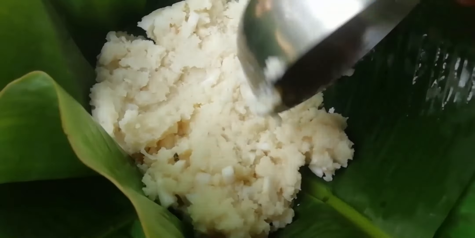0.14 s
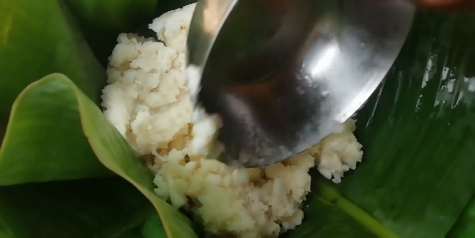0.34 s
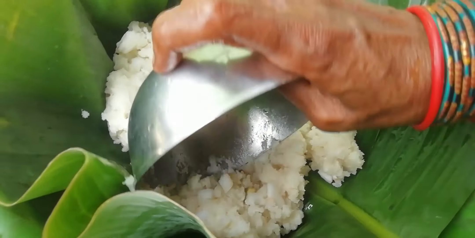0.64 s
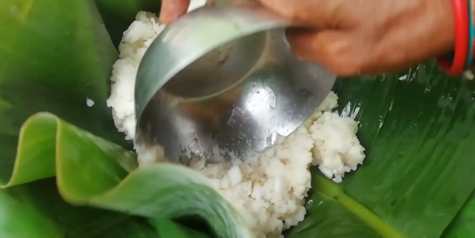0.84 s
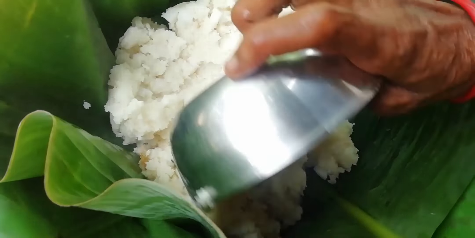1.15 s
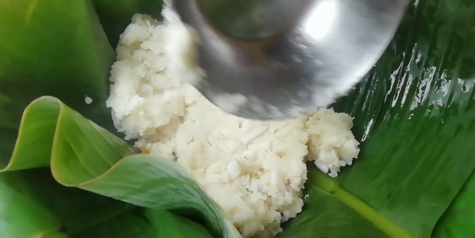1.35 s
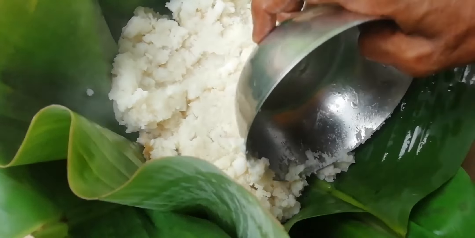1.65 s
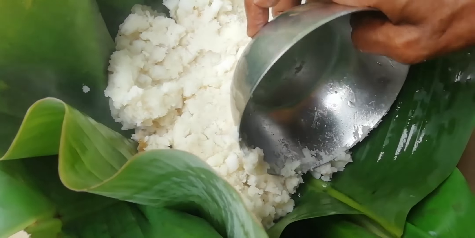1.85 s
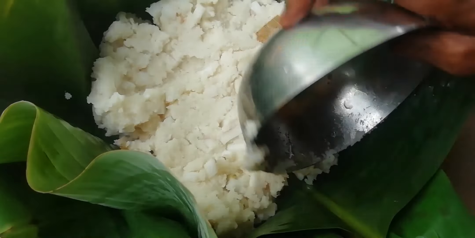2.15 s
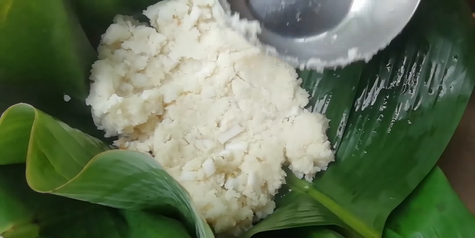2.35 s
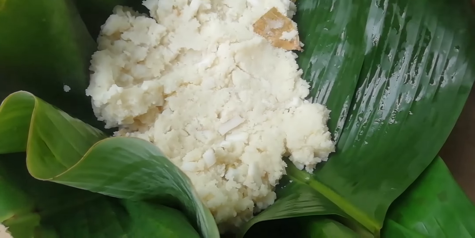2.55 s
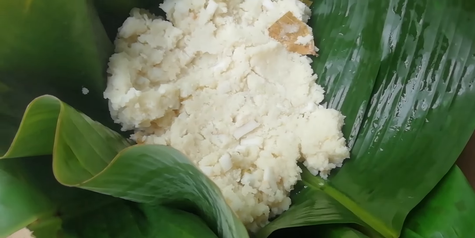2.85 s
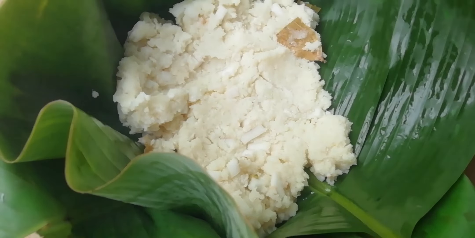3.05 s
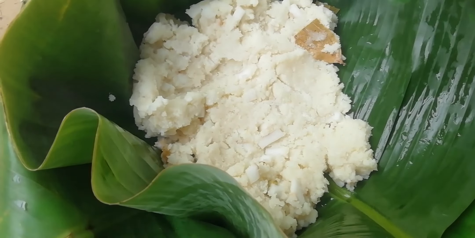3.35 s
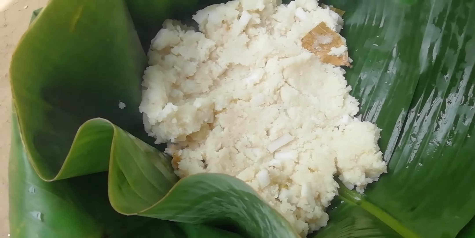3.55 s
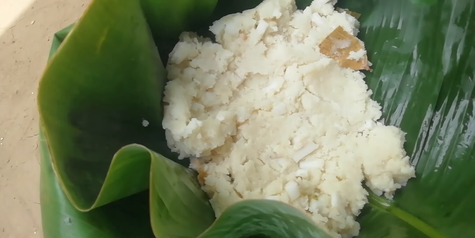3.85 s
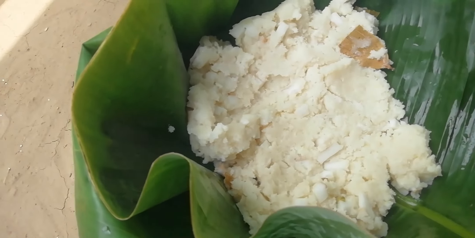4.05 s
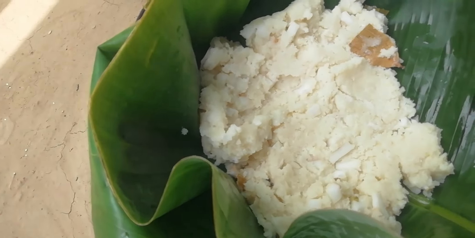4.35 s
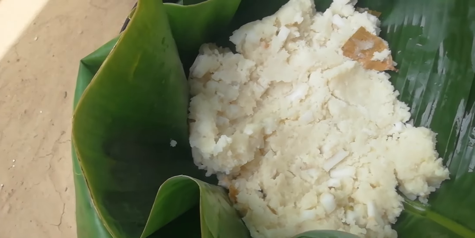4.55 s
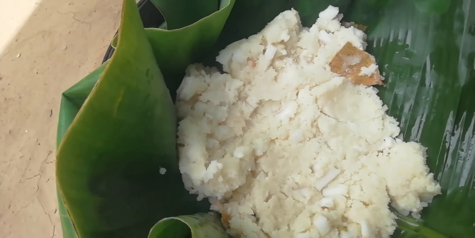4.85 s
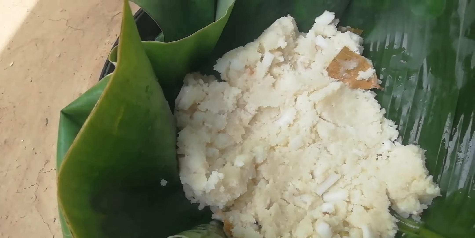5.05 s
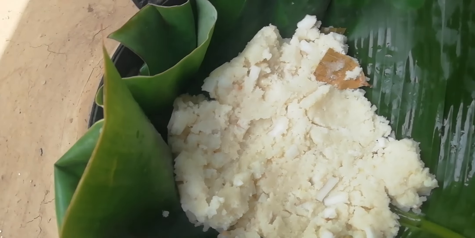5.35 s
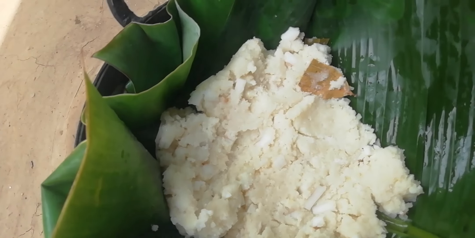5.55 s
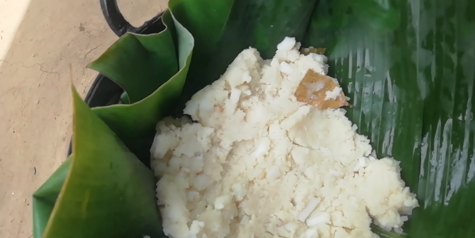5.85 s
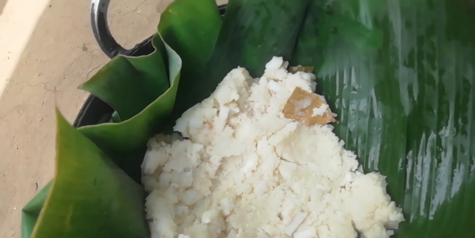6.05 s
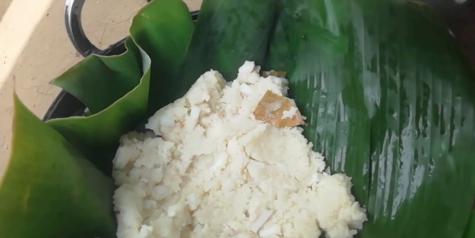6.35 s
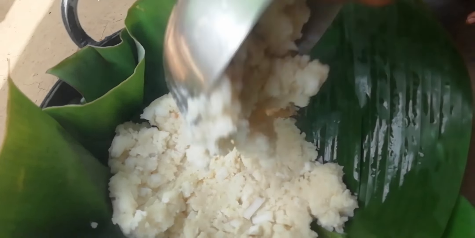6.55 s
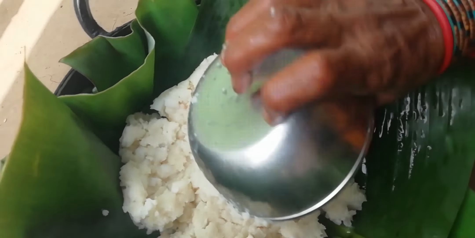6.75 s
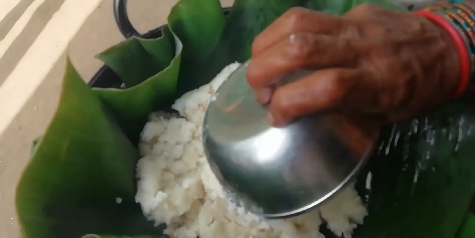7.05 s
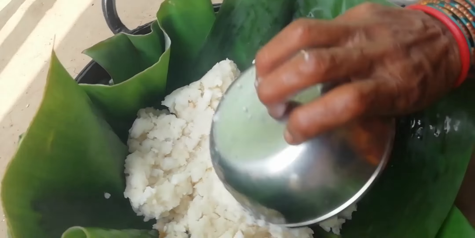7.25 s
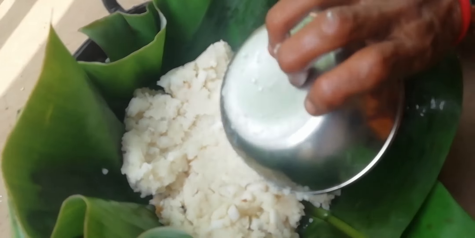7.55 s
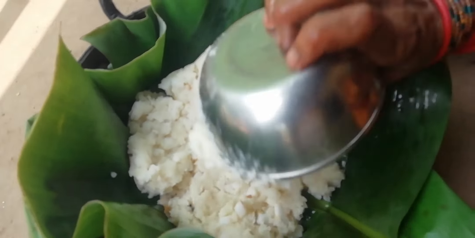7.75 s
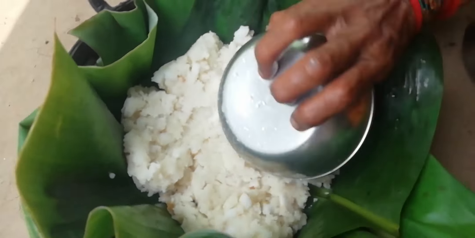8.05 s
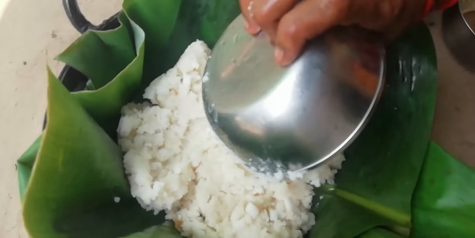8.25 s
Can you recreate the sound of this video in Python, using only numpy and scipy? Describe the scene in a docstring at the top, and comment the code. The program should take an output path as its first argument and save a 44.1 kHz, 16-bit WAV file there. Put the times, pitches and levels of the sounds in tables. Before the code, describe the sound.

Close up, in a quiet kitchen, a steel bowl works moist crumbly rice in a leaf-lined pot. From 0 to 0.5 s there is light, fizzy crackle with a few snaps; at about 0.6-0.9 s a firm, grainy scrape with woody leaf clicks. Shorter rubs follow, with another strong push near 1.7-2 s and brighter ticks until 2.5 s. A crisp snap lands near 2.9 s, then from 3 to 4.3 s the rustle is faint and sparse. Leaf snaps gather from 4.4 s, the sharpest at 4.7 s, with busy clusters at 5.2-5.6 s and 5.8-6.3 s. From 6.4 to 7.4 s it is nearly still, with thin ticks; a clear click comes at 7.5 s, then a soft wet rustle swells from 7.9 to 8.4 s. Occasional dull low pot bumps, very short reflections and gentle rumble lie underneath.

```python
"""A steel bowl pushes and spreads moist, crumbly rice in a pot lined with fresh leaves, close to the microphone.
Sticky grains part and scrape under the rim: a fine crackle of dense random clicks over a smooth hiss.
The stiff leaves buckle in short dry snaps, single clicks that scatter and ring in the pot.
Now and then a nudge rocks the pot, a few low decaying tones; behind it a quiet kitchen gives
faint reflections and a low rumble of shaped noise."""
import sys
import numpy as np
from scipy import signal
from scipy.fft import rfft, irfft
from scipy.io import wavfile
from scipy.ndimage import uniform_filter1d

SR = 44100
rng = np.random.default_rng(int(sys.argv[2]) if len(sys.argv) > 2 else 0)


def inscribe(sig):
    """Save sig as 16-bit PCM at rate SR to the path in sys.argv[1].

    A 1-D sig is mono; a 2-D sig holds one channel per row.
    Samples are clipped to [-1, 1] before scaling.
    """
    pcm = np.round(np.clip(np.atleast_2d(sig).T, -1, 1) * 32767)
    wavfile.write(sys.argv[1], SR, pcm.astype(np.int16))


N = 370440
SIZE, LEAD_IN = 1024, 24  # samples in one click, and those before its peak
TIME = np.arange(N) / SR
BIN_HZ = np.maximum(np.fft.rfftfreq(SIZE, 1 / SR), 1)
LONG_HZ = np.maximum(np.fft.rfftfreq(N, 1 / SR), 1)
SIDES = np.array([[1], [-1]])  # left, right


def from_db(db):
    """Decibels to gain."""
    return 10 ** (np.asarray(db) / 20)


def rms_one(x):
    """Scale to unit rms."""
    return x / np.sqrt(np.mean(x ** 2) + 1e-20)


def at_hz(points, hz, axis=1):
    """Read a column of a spectrum on a log-frequency axis."""
    points = np.array(points)
    return np.interp(np.log(hz), np.log(points[:, 0]), points[:, axis])


def in_time(rows, t):
    """Read every column of a curve at times t."""
    s, *columns = np.transpose(rows)
    return [np.interp(t, s, c) for c in columns]


def drift(rate):
    """Slow random wander of unit rms, with rate turning points drawn per second."""
    knots = rng.standard_normal(4096)
    return rms_one(np.interp(TIME * rate, np.arange(len(knots)), knots))


# level of the continuous rustle under the strokes: t/s, level/dB (before RUSTLE_DB)
RUSTLE_LEVEL = [(0.0, -30), (0.47, -33), (0.75, -23), (0.93, -30.5), (1.45, -29), (1.82, -27), (2.32, -32),
                (2.99, -36), (4.3, -40), (4.45, -37.5), (5.01, -38), (5.36, -36.5), (5.61, -40.5),
                (6.08, -32), (6.41, -40), (7.32, -41.5), (8.16, -30), (8.4, -31.5)]
RUSTLE_DB, RUSTLE_HOLLOW_DB, RUSTLE_FIZZ_DB = -2, -0.5, 8.5
# pushes of the bowl and shifts of the leaves: from t/s, to t/s, level/dB (at the start),
# hollowness/dB, fizz/dB
BOWL_STROKES = [(0.107, 0.169, -34.5, 9, 14), (0.567, 0.884, -21.5, -7.5, -13),
                (0.935, 1.185, -29, 3.5, -24), (1.408, 1.538, -31, 8, -9), (1.61, 1.73, -26.5, -0.5, -19),
                (1.713, 1.978, -20, -5.5, 2.5), (1.953, 2.257, -30.5, 3, 7), (2.524, 2.71, -35, -9, 1),
                (3.059, 3.084, -28.5, -5, 13.5), (3.251, 3.274, -31.5, -3, 9.5),
                (3.332, 3.455, -32, -2, -2), (3.655, 3.844, -34, 5, 3), (3.888, 4.048, -35.5, -1, 5),
                (4.274, 4.384, -34.5, 5, 8.5), (4.381, 4.474, -30, 2, 4), (4.529, 4.643, -34.5, -4, 6.5),
                (4.823, 4.83, -33, 8, 7), (5.19, 5.4, -32.5, 6.5, 4), (5.433, 5.45, -29.5, -15, -1),
                (5.833, 6.001, -31.5, 4.5, 3.5), (6.114, 6.262, -34, 6.5, 1), (6.284, 6.33, -31, 0, 3),
                (6.41, 6.448, -36.5, -5, 12), (6.804, 7.047, -39, -1.5, 8), (7.204, 7.39, -39.5, -7, 13),
                (7.48, 7.65, -38, -3, 1), (7.72, 7.756, -35.5, 1, -2), (7.824, 7.89, -36, -7, -7),
                (7.905, 8.381, -31, 1, 9)]
# each stroke grips, eases off as the rice gives way, and lets go
ATTACK_S, EASE_DB_PER_S, RELEASE_S = 0.038, 9.5, 0.028
# the rice sticks and slips, so the force wavers
SLIP_DB, SLIPS_PER_S = 0.83, 40


def rubbing():
    """Continuous rustle and strokes add in power: level, hollowness and fizz over time, in dB."""
    rustle_db = in_time(RUSTLE_LEVEL, TIME)[0] + RUSTLE_DB
    rustle_bands = from_db([[0], [RUSTLE_HOLLOW_DB], [RUSTLE_FIZZ_DB]])
    power = from_db(rustle_db) ** 2 * rustle_bands ** 2
    for start, stop, stroke_db, hollow_db, fizz_db in BOWL_STROKES:
        rise = (TIME - start) / ATTACK_S
        fall = (stop - TIME) / RELEASE_S
        grip = np.clip(np.minimum(rise, fall) + .5, 0, 1)
        on = grip > 0
        force = grip[on] * from_db(stroke_db - EASE_DB_PER_S * (TIME[on] - start))
        power[:, on] += (force * from_db([[0], [hollow_db], [fizz_db]])) ** 2
    middle, lows, treble = 10 * np.log10(power)
    return middle + SLIP_DB * drift(SLIPS_PER_S), lows - middle, treble - middle


def crackle(level_db, hollow_db, fizz_db, gain_db=-1, band_hz=1750, band_width_hz=550, band_db=-0.95,
            wander_db=2.5, wanders_per_s=30):
    """Rice and leaves rub with changing force, hollowness and wetness.

    The level of the band near 1.7 kHz wanders at random."""
    _, pan_db = in_time(PLACE_OF_WORK, TIME)
    bed = grains(level_db)
    spectrum = rfft(bed)
    lows = irfft(spectrum * hollow_share(LONG_HZ), N)
    treble = irfft(spectrum * fizz_share(LONG_HZ), N)
    band = signal.lfilter(*signal.iirpeak(band_hz, band_hz / band_width_hz, fs=SR), bed)
    bed = bed + lows * (from_db(hollow_db) - 1) + treble * (from_db(fizz_db) - 1)
    bed = bed + band * (from_db(band_db + wander_db * drift(wanders_per_s)) - 1)
    return bed * from_db(level_db + gain_db + SIDES * pan_db / 2)


# where the work goes on: t/s, lead of the left port/ms, left-right/dB
PLACE_OF_WORK = [(0, 0.093, -0.5), (.7, 0.11, 2.5), (1.5, .11, 0.5), (2.1, 0.091, 2.5), (2.7, 0.1, 2),
                 (3.6, 0.069, 1), (4.3, -0.045, -1), (5.3, 0.05, -0.5), (6.1, -.02, 1.5), (6.8, 0.077, 3.5),
                 (7.6, 0.076, 2), (8.4, 0.075, 1)]


def grains(level_db, per_s=1600, crowding=.4, spread_db=5.0, smoothing=0.061, largest=4.52,
           clump_db=2.0, hiss_db=-10, low_hz=700, high_hz=14000, count=24):
    """Sticky grains let go in clumps, each at one of count pitches, for a crackle of rms 1.

    Harder rubbing makes them denser and more even."""
    harder_db = level_db - np.mean(level_db)
    rate = per_s * from_db(crowding * harder_db + clump_db * drift(90))
    born = rng.random(N) < rate / SR
    size_db = (spread_db - smoothing * harder_db) * np.minimum(rng.exponential(1, N), largest)
    sizes = born * from_db(size_db) * rng.choice([-1, 1], N)
    # local levelling over 43 ms
    sizes /= np.sqrt(np.maximum(uniform_filter1d(sizes ** 2, int(0.043 * SR)), 1e-6))
    lead_ms, _ = in_time(PLACE_OF_WORK, TIME)
    lead = np.round(lead_ms * SR / 10 ** 3).astype(int)
    later = np.clip(np.arange(N) - lead, 0, N - 1)  # what the right port hears
    kinds, pot, out = rng.integers(0, count, N), pot_colour(), 0
    # between the grains, steel sliding on paste gives a smooth hiss
    force = sizes + from_db(hiss_db) * rng.standard_normal(N)
    for kind, hz in enumerate(np.geomspace(low_hz, high_hz, count)):
        train = force * (kinds == kind)
        colour = pot * ring(hz, lift_db=11.0, spread=0.34)
        wave = click(colour, scatter_db=9.5, scatter_t60=0.012)
        out = out + signal.oaconvolve(np.array([train, train[later]]), wave, axes=1)[:, :N]
    return rms_one(out)


# single snaps and ticks, loud and faint: t/s, level/dB (over 4.5 ms, before gain and band lifts),
# ring f/Hz, hollowness/dB, fizz/dB, left-right/dB
LEAF_SNAPS = [(0.083, -21.5, 2380, -7, 2, -1), (0.1357, -14.5, 1150, -4, -13, -3),
              (0.188, -23, 2880, -26, 1, 7), (0.2866, -16, 1840, 10.5, -1, -4.5),
              (0.456, -22, 2400, 0, -7, -5), (0.5875, -17, 4530, -13, -17, -3),
              (0.6742, -17, 1770, 2.5, -20, -4), (0.7568, -16, 1400, -14, -10, 4),
              (0.8108, -17.5, 1670, -2, -15, -5), (0.8651, -11, 1190, -5, -18, -5),
              (0.9485, -16, 3200, -4, -22, -1), (1.0912, -13.5, 1500, 8, -20, 2),
              (1.1328, -13.5, 1080, 5.5, -23, 7), (1.2608, -16, 3220, -3.5, 3, 3),
              (1.334, -19.5, 2250, 1.5, -21, -3), (1.3892, -16, 1750, 5, -16, 1),
              (1.5049, -19, 1900, 12, 2, -1), (1.5187, -12, 6200, -3, 4.5, 5),
              (1.5366, -15, 2010, 8, -2, 1), (1.6047, -14.5, 1880, 7.5, -16, -1),
              (1.8063, -12.5, 1740, 2.5, -20, 1), (1.8357, -18, 3050, -18, -8, -5),
              (1.9757, -18.5, 5930, 2, 1, 11), (1.9957, -16, 5000, 1, 7.5, 7.5),
              (2.1689, -21.5, 2460, 12.5, 4, 4), (2.18, -27, 4930, 12, -6, 8),
              (2.2534, -17, 4660, 4.5, 6, 7), (2.3519, -19, 2180, 5, 1, -2),
              (2.3698, -20.5, 2490, 5, -6, -3), (2.393, -23.5, 2180, -1, -11, 9),
              (2.4688, -16, 3580, -1, -2, 7), (2.5462, -22, 4400, 4, -10, 2),
              (2.7171, -25.5, 1970, 2.5, -4, -2), (2.7982, -22, 6000, -14, 9, -1),
              (2.909, -15.5, 2060, -4.5, 3.5, 7), (3.0561, -21, 2000, 2, 11, 2),
              (3.1559, -16, 1680, -1.5, 0, -3), (3.5235, -19, 3200, -5.5, 4, 14.5),
              (3.797, -28.5, 1900, 10, -4, 3), (3.887, -22.5, 1140, 4.5, -13, 0),
              (3.9622, -27, 4500, -17, 3, 18), (4.0805, -33, 2140, 5, 14, -3),
              (4.0979, -26.5, 1220, 3, -6, 0), (4.196, -33, 2060, -2, 16, 0),
              (4.2197, -21.5, 1550, 5.5, 1.5, 0), (4.2854, -25.5, 6130, -4, 12.5, 7),
              (4.3556, -24, 1890, 11.5, -12, 0), (4.3963, -21, 2050, 2, 3, 0),
              (4.4177, -29.5, 1860, -1, 19.5, -1), (4.4561, -19, 1420, 0.5, 1, -1),
              (4.6138, -18, 1810, 6, -30, -1), (4.6791, -8, 2470, 1.5, -0.5, -2.5),
              (4.7508, -13, 4790, 6.5, 0, -0.5), (4.8423, -16.5, 2680, 4, 1, 2),
              (4.8517, -19.5, 5930, -2, 0, 6.5), (4.9727, -27, 1900, 11.5, 0, 1),
              (5.0271, -26, 1970, 3, 6, -3), (5.098, -19, 1570, 10, -11, 1), (5.187, -24, 2730, 14, 4, -1),
              (5.2744, -17, 6100, 4.5, 6, 2), (5.2979, -22, 3720, 9, 14, 0),
              (5.3132, -18.5, 2600, -3, -9, 4), (5.328, -17, 2780, 0, 10, 2),
              (5.3605, -20.5, 2000, 7.5, 5, 2), (5.4311, -14, 4300, 0.5, -9, 0),
              (5.4504, -18, 4900, -1, -1, 4), (5.531, -17, 2980, -4, 8.5, 8.5),
              (5.551, -18.5, 2860, 2, 8.5, 1), (5.7834, -28, 6040, -7, 10.5, 5),
              (5.8466, -21, 5300, 5, -13, 3), (5.8797, -19, 1930, 8.5, -12, -2),
              (5.901, -23.5, 2000, 12, -1, -1), (5.9442, -17, 2280, 9.5, 0, 1),
              (5.96, -18.5, 1900, 13.5, -7, 0), (6.0173, -15, 5450, 3, 4.5, 1),
              (6.053, -10.5, 2580, 10, 4, 1), (6.1226, -27.5, 2000, 13.5, -5, -1),
              (6.1643, -16, 5900, 4, 4.5, 1.5), (6.2002, -18, 2130, -8, -11, 10),
              (6.218, -14.5, 2370, 9, 0, 1), (6.3007, -16.5, 726, 4, 5.5, 3),
              (6.319, -20.5, 3050, -3, -3, 6), (6.6752, -25.5, 1450, -2, -19, -1),
              (6.7454, -27, 2570, -1, 18.5, 0), (6.7582, -21.5, 4540, 3, 8, 3),
              (6.8344, -30.5, 1950, 14.5, 15, -2), (6.9033, -22, 1140, -26, 1, 14.5),
              (6.975, -27.5, 1970, -4, -11, -6), (7.1407, -19.5, 4200, -11, 12.5, 3),
              (7.2663, -29.5, 2630, -2, 7, 1), (7.4406, -30, 2120, -6, 19.5, -2),
              (7.4916, -14.5, 1160, -7, -8, -2.5), (7.56, -22, 3060, -1, -8, 2),
              (7.6432, -20.5, 4340, -9, 5, -2), (7.7972, -18, 3300, -5, -21, 3),
              (8.0215, -18.5, 4450, 3, 4, -3), (8.1571, -17.5, 5400, 1.5, -3, 0),
              (8.2076, -21, 2230, 5.5, 8, 3), (8.337, -18, 4280, 5, 4, 2)]


def snaps(rows, gain_db=-2.73, bite_db=-2.0, dulling=0.11, dull_hz=1800, sharp_hz=3100):
    """Each buckling fold has its own size, ring and place; the hollower it is, the less it bites."""
    out, pot = np.zeros((2, N + 2 * SIZE)), pot_colour(low_cut_hz=344)
    hollow, fizz = hollow_share(BIN_HZ), fizz_share(BIN_HZ)
    # bite tilts the middle band from dull to sharp
    bite = at_hz([(dull_hz, -1), (sharp_hz, 1)], BIN_HZ) * (1 - hollow - fizz)
    length = np.sqrt(.0045 * SR)  # click energy to level over 4.5 ms
    for s, level_db, hz, hollow_db, fizz_db, pan_db in rows:
        tilt_db = (bite_db - dulling * hollow_db) * bite
        bands_db = hollow_db * hollow + tilt_db + fizz_db * fizz
        colour = pot * from_db(bands_db + SIDES * pan_db / 2)
        colour = colour * ring(hz, lift_db=7.5, spread=0.11)
        wave = click(colour, scatter_db=5.0, scatter_t60=0.0067) * length * from_db(level_db + gain_db)
        lead_ms, _ = in_time(PLACE_OF_WORK, s)
        starts = [round(s * SR), round((s + lead_ms / 10 ** 3) * SR)]
        for port, start in enumerate(starts):
            out[port, start - LEAD_IN:start - LEAD_IN + SIZE] += wave[port]
    return out[:, :N]


# small snaps come by chance: how often, how far above the rubbing, and how unevenly
SMALL_SNAPS_PER_S, SMALL_ABOVE_DB, SMALL_SPREAD_DB = 15, 5, 1.5


def small_snaps(rub_db, follows=0.79, low_hz=1700, high_hz=5800, hollow_db=1, hollow_spread_db=5,
                fizz_db=0, fizz_spread_db=5.0):
    """Small folds give way at random, louder under harder rubbing; rows like those of LEAF_SNAPS."""
    count = 400  # more than the scene can hold
    chance = rng.random((count, 2))
    normal = np.clip(rng.standard_normal((count, 4)), -2, 2)
    s = np.cumsum(2 * chance[:, 0]) / SMALL_SNAPS_PER_S
    rub_now_db = np.interp(s, TIME, rub_db)
    level_db = follows * rub_now_db + (1 - follows) * np.mean(rub_db) + SMALL_ABOVE_DB
    rows = np.transpose([s,
                         level_db + SMALL_SPREAD_DB * normal[:, 0],
                         low_hz * (high_hz / low_hz) ** chance[:, 1],
                         hollow_db + hollow_spread_db * normal[:, 1],
                         fizz_db + fizz_spread_db * normal[:, 2],
                         in_time(PLACE_OF_WORK, s)[1] + 3 * normal[:, 3]])
    return rows[(s > SIZE / SR) & (s < TIME[-1])]


def click(colour, scatter_db, scatter_t60, even_hz=1000):
    """One sharp release, followed by its scatter between leaves, bowl and pot wall."""
    burst = rng.standard_normal((2, SIZE)) * from_db(-60 * np.arange(SIZE) / SR / scatter_t60)
    burst *= from_db(scatter_db) / np.sqrt(np.sum(burst ** 2) / 2)
    spectrum = 1 + two_ports(rfft(burst), BIN_HZ)
    # even out the broad spectrum so that the colour sets it
    even_bins = max(int(even_hz * SIZE / SR), 3)
    gain = colour / np.sqrt(uniform_filter1d(abs(spectrum) ** 2, even_bins))
    # both ports hear the same ringing, each with its own weighting
    shared = np.sqrt(gain[0] * gain[1])
    wave = irfft(spectrum * causal(shared) * gain / shared)
    return np.roll(wave, LEAD_IN, axis=1) * rng.choice([-1, 1])


def hollow_share(hz, low_hz=900, high_hz=1450):
    """The lows, which grow when a large piece of leaf moves."""
    return at_hz([(low_hz, 1), (high_hz, 0)], hz)


def fizz_share(hz, low_hz=6300, high_hz=9200):
    """The treble, which grows when wet surfaces part."""
    return at_hz([(low_hz, 0), (high_hz, 1)], hz)


def ring(hz, lift_db, spread):
    """Gain of one broad resonance; spread is a share of its pitch."""
    return from_db(lift_db * np.exp(-.5 * (np.log(BIN_HZ / hz) / spread) ** 2))


def causal(gain):
    """Minimum-phase response with the given magnitude: its energy comes as early as it can."""
    cepstrum = irfft(np.log(gain + 1e-6))
    cepstrum[..., 1:SIZE // 2] *= 2
    cepstrum[..., SIZE // 2 + 1:] = 0
    return np.exp(rfft(cepstrum))


# bands that stand out for a while: from t/s, to t/s, f/Hz, width f/Hz, lift level/dB
PASSING_RESONANCES = [(0, 0.55, 3330, 700, 5), (0.544, 0.87, 1540, 380, 5.5), (1.312, 1.65, 1820, 250, 5.5),
                      (1.312, 1.705, 5700, 700, 6), (1.688, 1.99, 3180, 400, 3),
                      (1.962, 2.251, 900, 110, 7.5), (2.065, 2.514, 3580, 280, 7),
                      (2.037, 2.3, 4830, 500, 4.5), (3.304, 4, 1120, 320, 6), (3.49, 3.576, 3050, 700, 2),
                      (3.5, 4.604, 14800, 900, 5), (4.25, 4.866, 2620, 400, 2),
                      (5.195, 5.798, 2900, 400, 4.5), (5.226, 5.795, 9940, 1600, 6.5),
                      (5.83, 6.34, 830, 220, 1.5), (6.89, 7.57, 1190, 180, 6.5),
                      (7.476, 7.826, 3300, 450, 3)]


def passing_resonances(x):
    """Each row lifts one band of the sound while it lasts."""
    out = x.copy()
    for start, stop, hz, width_hz, lift_db in PASSING_RESONANCES:
        # fades in and out over 13 ms
        fade = np.clip(np.minimum(TIME - start, stop - TIME) / 0.013 + .5, 0, 1)
        band = signal.lfilter(*signal.iirpeak(hz, hz / width_hz, fs=SR), x)
        out += (from_db(lift_db) - 1) * fade * band
    return out


# the leaf-lined pot at each microphone port, relative: f/Hz, left level/dB, right level/dB
POT_SPECTRUM = [(250, -22, -24.5), (478, -14.5, -10), (860, -6, -6), (1254, -9.5, -9), (1700, -4, 3.5),
                (2420, -6.5, -5.5), (3050, -1.5, -0.5), (4100, -3, -5), (4620, -2, -13.5),
                (6390, -7, -16.5), (7870, -19.5, -23.5), (10360, -14.5, -13.5), (13400, -13, -14),
                (14600, -12, -9)]


def pot_colour(low_cut_hz=230):
    """The pot's resonances as gain per port, of rms 1 so that a unit click keeps unit energy."""
    left_db, right_db = at_hz(POT_SPECTRUM, BIN_HZ, axis=1), at_hz(POT_SPECTRUM, BIN_HZ, axis=2)
    return rms_one(from_db([left_db, right_db]) / np.sqrt(1 + (low_cut_hz / BIN_HZ) ** 4))


# likeness of the two microphone ports: f/Hz, likeness/0-1
PORT_LIKENESS = [(60, 1), (700, 0.77), (1600, 0.88), (3000, 0), (5000, 0), (16000, 0)]


def two_ports(spectra, hz):
    """Two unrelated spectra become left and right, alike in the bass."""
    alike = np.clip(at_hz(PORT_LIKENESS, hz), 0, 1)
    middle = np.sqrt((1 + alike) / 2) * spectra[0]
    side = np.sqrt((1 - alike) / 2) * spectra[1]
    return middle + side * SIDES


# soft bumps against the pot: t/s, level/dB (of a mode at 0 dB)
POT_BUMPS = [(0.155, -50), (0.474, -47), (1.079, -39), (1.499, -56), (3.682, -42), (6.481, -52),
             (8.029, -47)]
# the pot on the ground, before small random shifts: f/Hz, level/dB, t60/s
POT_GROUND_MODES = [(47, 0, 0.27), (75, 7, 0.094), (105, -9, 0.14), (187, -6.5, 0.23)]


def bumps(rise_s=0.006):
    """A soft push rocks the heavy pot: a few low modes rise gently and die away."""
    out, t = np.zeros(N), np.arange(SR // 4) / SR
    for s, level_db in POT_BUMPS:
        thud = 0
        for hz, db, t60 in POT_GROUND_MODES:
            decay = from_db(db + rng.normal(0, 0.26) - 60 * t / t60)
            cycles = hz * rng.uniform(0.88, 1.06) * t + rng.random()
            thud = thud + decay * np.sin(2 * np.pi * cycles)
        start = int(s * SR)
        out[start:start + len(t)] += (from_db(level_db) * thud * (1 - np.exp(-t / rise_s)))[:N - start]
    return out


def echoes(x, wet_db, t60, delay_s, dull_hz):
    """Dense reflections that die away, as decaying noise; wet_db is their level before dulling."""
    t = np.arange(SR // 2) / SR
    tail = rng.standard_normal((2, len(t))) * from_db(-60 * t / t60) * (t > delay_s)
    tail *= from_db(wet_db) / np.sqrt(np.sum(tail ** 2) / 2)
    tail = signal.lfilter(*signal.butter(1, min(dull_hz, .45 * SR), fs=SR), tail)
    return signal.oaconvolve(x, tail, axes=1)[:, :N]


# shape of the background rumble, relative: f/Hz, level/dB per Hz
RUMBLE_SPECTRUM = [(15, -9), (36, 0), (70, -2), (140, -6), (250, -12.5), (500, -20), (1500, -54),
                   (16000, -40)]
# its swell, before gain: t/s, level/dB
RUMBLE_SWELL = [(0.0, -59), (1.12, -62), (1.68, -56.5), (2.34, -61.5), (2.71, -60.5), (3.06, -59.5),
                (3.7, -60), (3.84, -56.5), (4.16, -59), (8.4, -60.5)]


def rumble(gain_db=1):
    """Low background of shaped noise that swells and sinks."""
    noise = two_ports(rfft(rng.standard_normal((2, N))), LONG_HZ)
    level_db, = in_time(RUMBLE_SWELL, TIME)
    shape = from_db(at_hz(RUMBLE_SPECTRUM, LONG_HZ)) * (LONG_HZ > 10)
    return from_db(level_db + gain_db) * rms_one(irfft(noise * shape, N))


def scene():
    """Snaps and crackle ring briefly in the pot, then in the kitchen."""
    level_db, hollow_db, fizz_db = rubbing()
    leaves = snaps(LEAF_SNAPS) + snaps(small_snaps(level_db))
    work = passing_resonances(crackle(level_db, hollow_db, fizz_db) + leaves)
    in_pot = echoes(work, wet_db=-13.5, t60=0.024, delay_s=0.0012, dull_hz=9250)
    kitchen = echoes(work, wet_db=-17.5, t60=0.12, delay_s=0.011, dull_hz=7100)
    return work + in_pot + kitchen + bumps() + rumble()


def record(dry, port_hz=14700, port_width_hz=500, port_db=3.5, edge_hz=15300, cutoff_hz=16200):
    """The microphone ports ring near the top; peaks are rounded and the top is cut."""
    ring_up = signal.lfilter(*signal.iirpeak(port_hz, port_hz / port_width_hz, fs=SR), dry)
    ringing = dry + (from_db(port_db) - 1) * ring_up
    rounded = 1.15 * np.tanh(ringing / 1.15)
    top = np.clip((cutoff_hz - LONG_HZ) / max(cutoff_hz - edge_hz, 100), 0, 1) ** 2
    return irfft(rfft(rounded) * top, N)


dry = scene()
out = record(dry)
inscribe(out)
```